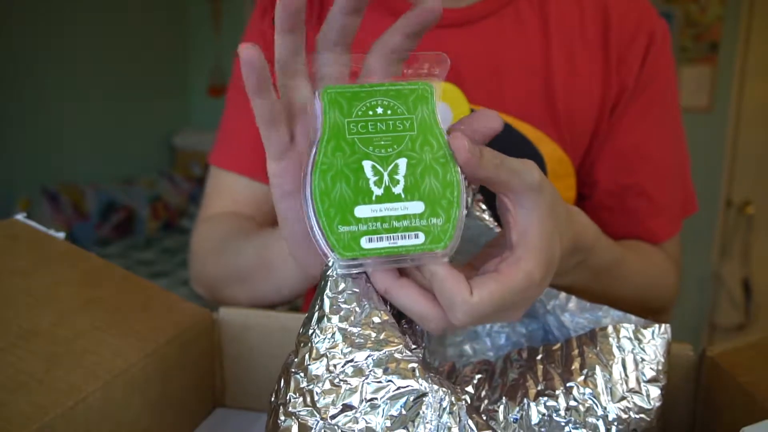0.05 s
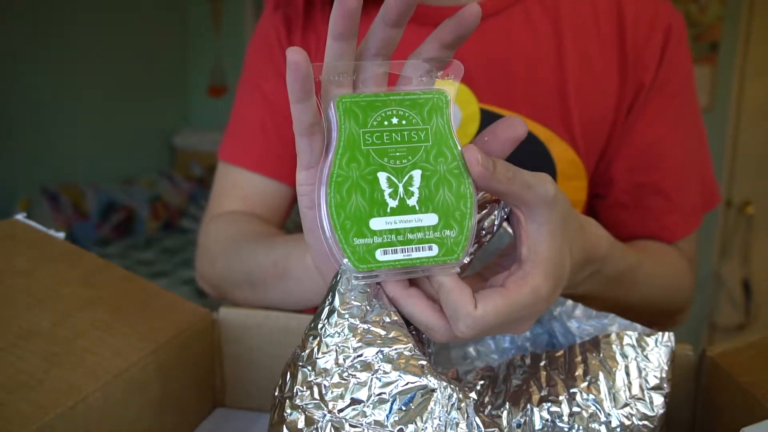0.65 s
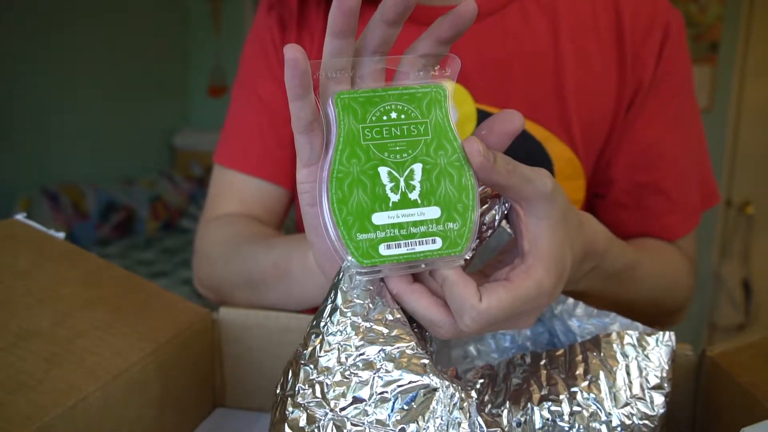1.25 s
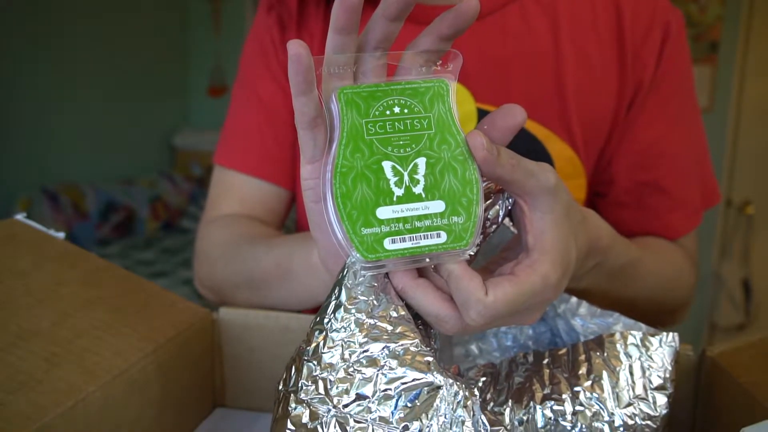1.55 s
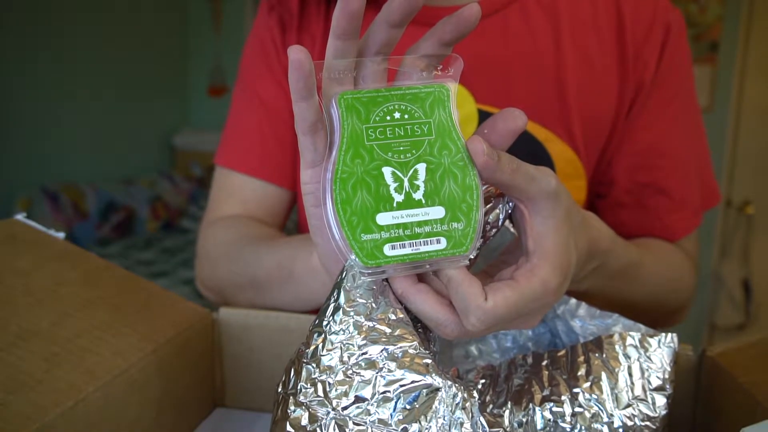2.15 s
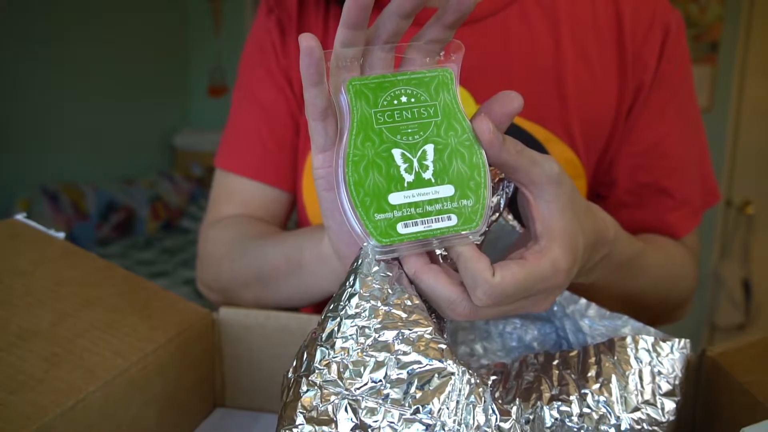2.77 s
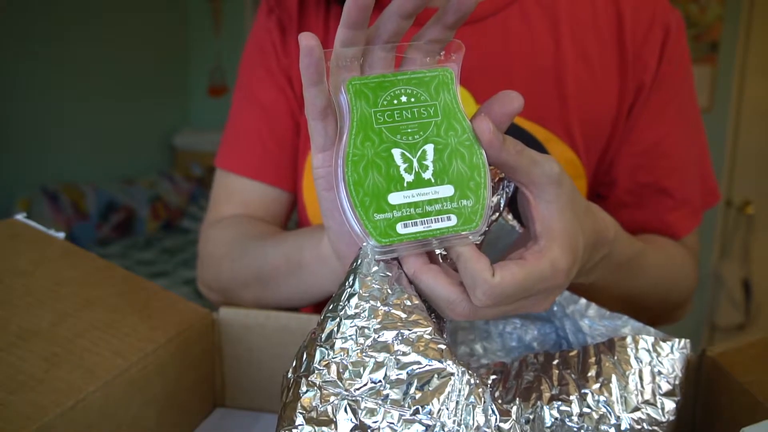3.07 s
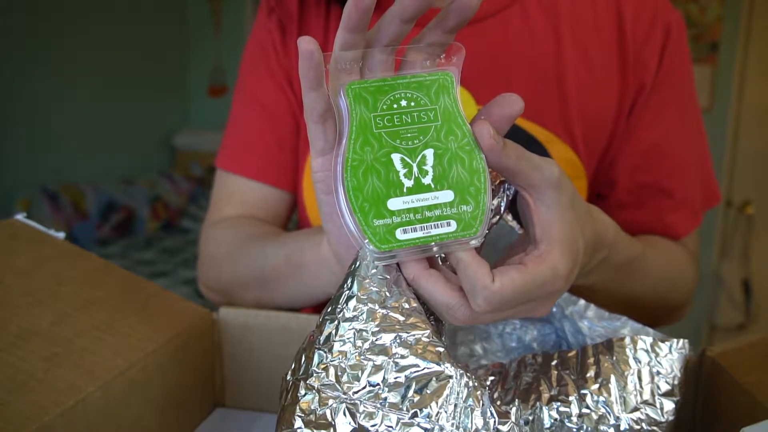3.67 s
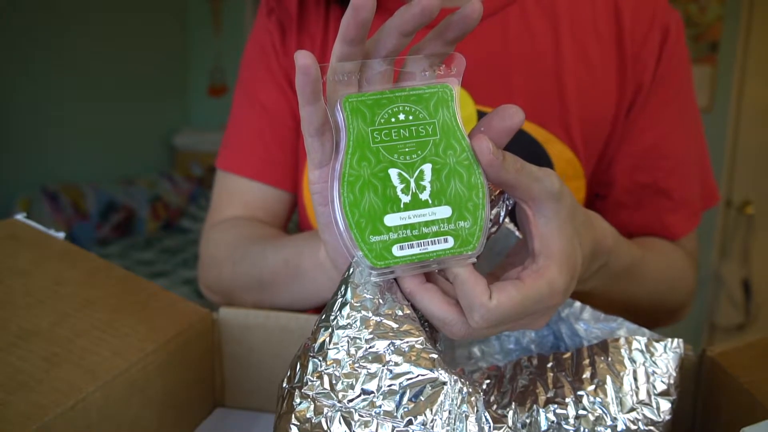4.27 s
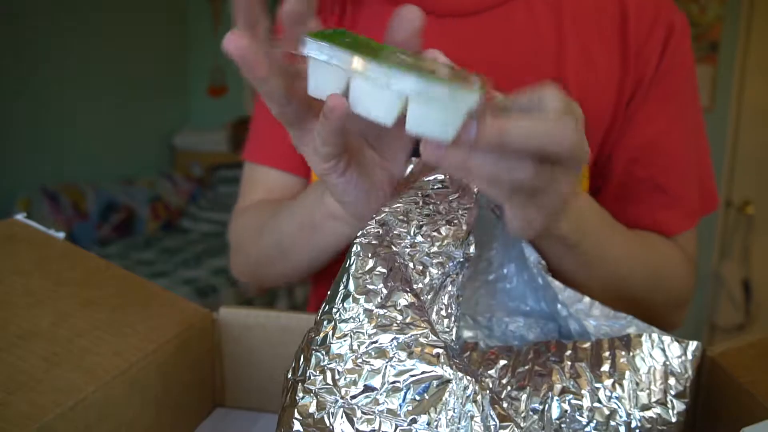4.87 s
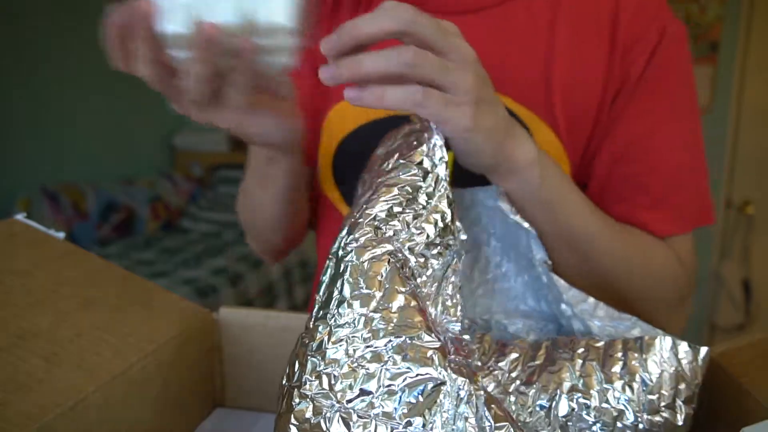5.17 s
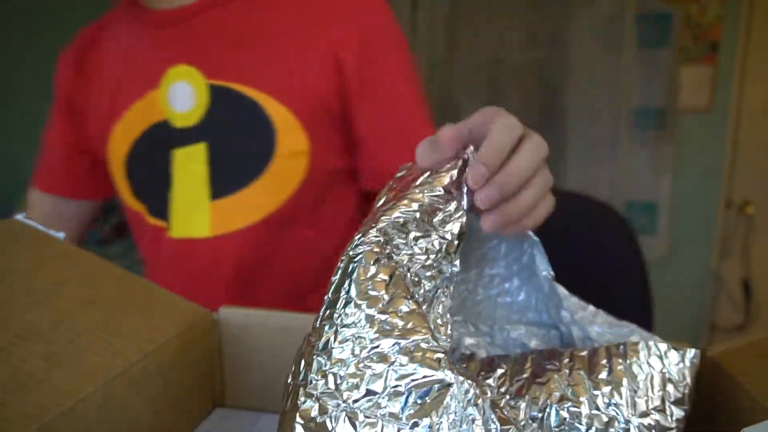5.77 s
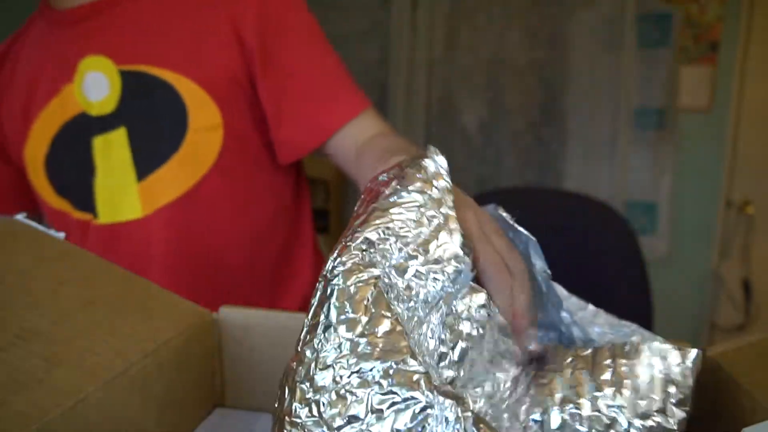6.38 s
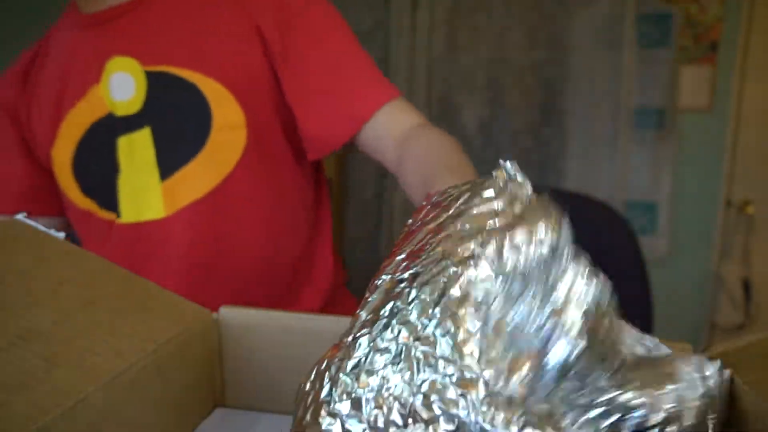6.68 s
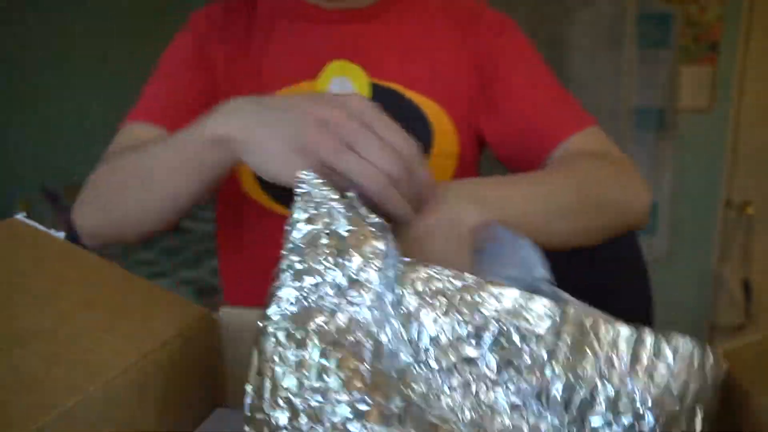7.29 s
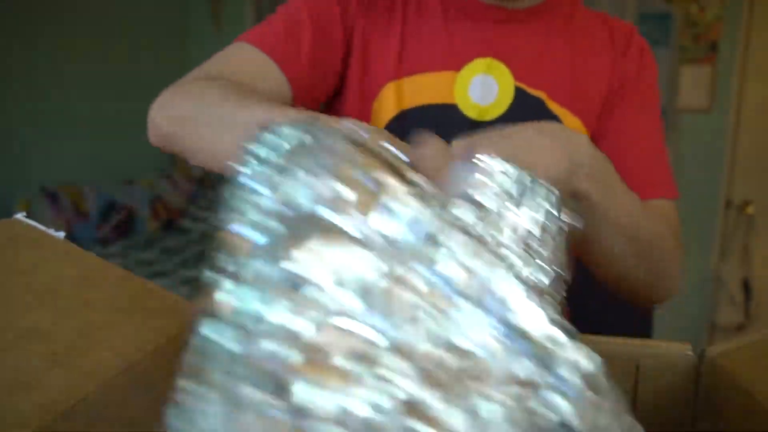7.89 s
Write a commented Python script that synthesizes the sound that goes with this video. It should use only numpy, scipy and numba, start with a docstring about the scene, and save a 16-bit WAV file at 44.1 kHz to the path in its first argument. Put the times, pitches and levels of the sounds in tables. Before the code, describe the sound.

A low fan hum runs throughout in a small furnished room, heard through a close stereo microphone. For the first second a foil-lined bubble bag crackles lightly with sharp single snaps. It then settles into faint, scattered ticks until about 4.6 seconds, with one brief soft crinkle, finger rub and low cardboard rumble around 2.4 seconds. The foil stirs again, and a thin plastic case clacks in the fingers just before 5 seconds. Uneven bursts of crinkling and crisp snaps follow, with hollow pops near 5.9 seconds. At about 6.2 seconds a cardboard box takes a strong hollow bump and several quick lighter knocks. From 6.4 seconds hands dig into the bag and the crinkling becomes dense, bright and loud, while the hum swells slightly. The rustling peaks around 7.7 seconds, with a cluster of hollow pops from the bag, and continues to the end at about 8 seconds.

```python
"""A foil-lined bubble bag crinkles as hands hold a thin plastic case against it, set that aside and dig in.
Its creases buckle and release stored elastic energy as snaps, singly at first, then in dense showers.
Fingers rub the sheet and broad panels pop hollowly; the case and a carton ring in their modes when hit.
A close stereo microphone hears it in a small furnished room where a fan hums."""
import sys
import numpy as np
from scipy import signal
from scipy.fft import rfft, irfft
from scipy.io import wavfile
from numba import njit

SR = 44100
rng = np.random.default_rng(int(sys.argv[2]) if len(sys.argv) > 2 else 0)


def int16_out(signal):
    """Quantize to a 16-bit WAV file."""
    q = np.round(np.clip(np.atleast_2d(signal).T, -1, 1) * 32767)
    wavfile.write(sys.argv[1], SR, q.astype(np.int16))


N = 354563
T = np.arange(N) / SR


def amp(db):
    """Amplitude ratio of a level in decibels."""
    return 10 ** (np.asarray(db) / 20)


def unit(x):
    """Normalisation to an rms of 1."""
    return x / np.sqrt(np.mean(x ** 2) + 1e-20)


def add(out, s, sound):
    """Superposition: a sound joins the mix at s seconds."""
    i = max(0, int(s * SR))
    out[:, i:i + sound.shape[-1]] += sound[..., :max(0, N - i)]


def colour(x, points, size=8192):
    """Minimum-phase filtering through (Hz, dB) points, by the folded cepstrum."""
    hz, db = np.transpose(points)
    bin_hz = np.arange(size // 2 + 1) * SR / size
    gain = amp(np.interp(np.log(bin_hz + 1), np.log(hz), db))
    cepstrum = irfft(np.log(gain))
    cepstrum[1:size // 2] *= 2
    cepstrum[size // 2 + 1:] = 0
    response = irfft(np.exp(rfft(cepstrum))).reshape((1,) * (x.ndim - 1) + (-1,))
    return signal.fftconvolve(x, response, axes=-1)[..., :x.shape[-1]]


def ring(x, hz, q):
    """Second-order resonance with gain 1 at its centre."""
    hz = min(hz, .4 * SR)
    return signal.lfilter(*signal.iirpeak(hz, max(q, 4 * hz / SR), fs=SR), x)


def stereo_noise(count):
    """White noise with uncorrelated mid and side."""
    mid, side = rng.standard_normal((2, count))
    return np.array([mid + side, mid - side])


def crack(t60, count=1024):
    """Exponential damping: a noise burst of unit energy falls 60 dB in t60 seconds."""
    burst = stereo_noise(count) * amp(-60 * T[:count] / t60)
    return unit(burst) / np.sqrt(count)


@njit
def scatter(starts, sizes, kinds, facets, count):
    """Sparse convolution: each flip adds its facet's stereo impulse response."""
    out = np.zeros((2, count + facets.shape[2]))
    for k in range(len(starts)):
        for side in range(2):
            for i in range(facets.shape[2]):
                out[side, starts[k] + i] += sizes[k] * facets[kinds[k], side, i]
    return out[:, :count]


def shower(db, rate, spectrum, low_hz, high_hz, t60, spread_db, ring_db, count=120, size=512):
    """Shot noise: resonant facets of foil flip at random moments, most weakly, a few strongly."""
    bursts = stereo_noise(count * size).reshape(2, count, size).swapaxes(0, 1)
    bursts = bursts * amp(-60 * T[:size] / t60)
    pitches = np.geomspace(low_hz, high_hz, count)
    facets = np.array([b + amp(ring_db) * ring(b, hz, q=8.6) for b, hz in zip(bursts, pitches)])
    facets = colour(facets, spectrum, size=1024)
    facets /= np.sqrt(np.sum(facets.mean(axis=1) ** 2) / count)
    strength_db = spread_db * np.minimum(rng.standard_exponential(N), np.pi)
    sizes = unit(amp(strength_db)) * rng.choice([-1, 1], N)
    sizes = sizes * amp(db) * np.sqrt(SR / rate)  # the flips of each second share its energy
    kinds = rng.integers(0, count, N)
    starts = np.flatnonzero(rng.random(N) < rate / SR)
    return scatter(starts, sizes[starts], kinds[starts], facets, N)


# Faint crinkle of the bag while it is only held. Each row: time in seconds, level in dB.
GRIP_LEVELS = [(0, -53), (.6, -55.5), (.9, -61), (1.4, -64), (1.55, -72.5), (1.8, -66), (2.7, -69.5),
               (3.2, -72), (3.6, -72), (4.2, -73), (4.55, -68.5), (4.7, -61)]
# The hands squeeze or shift the bag.
# Each row: start in seconds, length in seconds, level of small creases in dB, level of broad folds in dB.
BAG_SQUEEZES = [(-.05, 0.065, -36, -40), (0.052, 0.21, -36.5, -41.5), (0.32, 0.048, -45, -50),
                (2.353, 0.19, -46, -43), (2.608, 0.14, -62.5, -52.5), (3.711, 0.3, -65, -54.5),
                (4.654, 0.19, -45, -46.5), (4.786, 0.34, -52, -49.5), (5.074, 0.15, -34.5, -40),
                (5.177, 0.055, -34.5, -35.5), (5.292, 0.12, -47.5, -43.5), (5.454, 0.2, -40, -44.5),
                (5.635, 0.3, -40, -42), (5.873, 0.099, -33.5, -34), (5.978, 0.33, -39, -41.5),
                (6.115, 0.28, -35.5, -34), (6.397, 0.19, -30, -28.5), (6.598, 0.12, -31.5, -30.5),
                (6.673, .15, -26.5, -28.5), (6.866, .2, -27, -29.5), (7.07, 0.1, -26.5, -25.5),
                (7.239, 0.15, -31.5, -29.5), (7.336, .28, -25, -25.5), (7.601, 0.067, -22, -23),
                (7.684, 0.13, -21, -23), (7.806, 0.2, -26.5, -25.5)]


def effort(attack_s=0.049, release_s=0.038, grip_fold_db=1.5):
    """Incoherent sources add in power: grip and squeezes sum to crease and fold levels in dB."""
    grip_db = np.interp(T, *np.transpose(GRIP_LEVELS))
    power = amp([grip_db, grip_db + grip_fold_db]) ** 2
    for s, length, crease_db, fold_db in BAG_SQUEEZES:
        build_up = np.clip((T - s) / attack_s, 0, 1)
        settling = np.exp(-np.clip(T - s - length, 0, 1) / release_s)
        power += (amp([[crease_db], [fold_db]]) * build_up * settling) ** 2
    return 10 * np.log10(power)


# Spectra of small creases and of broad folds. Each row: frequency in Hz, relative level in dB.
CREASE_SPECTRUM = [(200, -24), (600, -15), (1500, 3), (3500, 3.5), (5000, 5.5), (7000, 3), (10500, 4),
                   (16000, 0)]
FOLD_SPECTRUM = [(120, -15), (280, -7.5), (480, -5.5), (800, -4), (1150, -7.5), (1750, -3.5), (2400, -6),
                 (3100, -5.5), (4400, -8.5), (6200, -14), (15000, -17)]


def crinkle():
    """Buckling under load: the harder the bag is worked, the more creases and folds give way."""
    crease_db, fold_db = effort()
    crease_rate = 150 + 2600 * amp(.85 * (crease_db + 26.5))  # flips per second
    fold_rate = 90 + .6 * crease_rate
    creases = shower(crease_db, crease_rate, CREASE_SPECTRUM,
                     low_hz=2500, high_hz=15000, t60=.007, spread_db=4.2, ring_db=0)
    folds = shower(fold_db, fold_rate, FOLD_SPECTRUM,
                   low_hz=480, high_hz=4800, t60=.015, spread_db=4, ring_db=2)
    return amp(-2.2) * creases + amp(0.23) * folds


# The rush of air. Each row: frequency in Hz, relative level in dB.
AIR_SPECTRUM = [(15, 5), (28, -11), (65, -0.5), (85, -2), (100, -3), (142, 5.5), (175, -10), (290, -13),
                (480, -22), (820, -19), (1100, -30), (3000, -37), (7000, -44.5), (16000, -48.5)]
# Fan and mains tones. Each row: frequency in Hz, level before the swell in dB, wander in Hz.
HUM_TONES = [(96.3, -49, 1.474), (105.1, -53, 1.14), (122.1, -51, 0.28), (137.9, -50, 0.26),
             (367, -65.5, 4.4), (405, -75.5, 3.04), (807, -68.5, 22.6)]
# The slow swell of air and hum together. Each row: time in seconds, gain in dB.
FAN_SWELL = [(0, 2), (1.2, 2), (2.2, 0.5), (3.2, 0), (4.2, 1), (4.7, 1), (5.7, 1), (6.6, 5), (8.04, 3)]


def fan():
    """Tonal and broadband noise: frequency-modulated motor tones waver over a low rush of air."""
    out = amp(-42.5) * unit(colour(stereo_noise(N), AIR_SPECTRUM))
    for hz, db, wander_hz in HUM_TONES:
        drift = np.interp(T, np.linspace(0, T[-1], 80), rng.standard_normal(80))
        cycles = np.cumsum(hz + wander_hz * drift) / SR + rng.random()
        out += amp(db) * np.sqrt(2) * np.sin(2 * np.pi * cycles)
    return out * amp(np.interp(T, *np.transpose(FAN_SWELL)))


def faint_ticks(count=20, until_s=4.7, doubling_db=9, low_hz=1500, high_hz=4000, flutter_db=3):
    """A random point process: rows of faint, dull snaps, denser where the grip is tighter."""
    moment, size, pitch = rng.random((count, 3)).T
    held = T[T < until_s]
    rate = 2 ** (np.interp(held, *np.transpose(GRIP_LEVELS)) / doubling_db)
    starts = np.interp((np.arange(count) + moment) / count, np.cumsum(rate) / rate.sum(), held)
    db = -42 + 4 * (2 * size - 1)
    hz = low_hz * (high_hz / low_hz) ** pitch
    return list(zip(starts, db, hz, np.full(count, flutter_db)))


# The loudest single snaps of foil and plastic.
# Each row: start in seconds, level in dB, resonance in Hz, flutter level relative to the tick in dB.
CREASE_SNAPS = [(0.037, -19, 3490, 2.5), (0.045, -14, 5220, -6), (0.0739, -12.5, 4390, -9),
                (.1098, -17.5, 1730, 1), (0.1434, -16.5, 5950, 3), (.1514, -23, 1790, 0),
                (.2678, -26, 1610, 8.5), (0.357, -21.5, 4420, -2), (.408, -24.5, 3380, -12),
                (0.4768, -35, 1770, 12.5), (0.5507, -13, 5650, -5.5), (.611, -19, 4690, -1),
                (.65, -22.5, 2180, -3), (.662, -23, 4600, -19), (.699, -25.5, 8900, -10),
                (.7555, -28.5, 4420, 2), (.818, -22, 9000, -17), (.831, -25, 3860, -4),
                (0.9362, -25, 3780, -5.5), (1.058, -27, 3370, -.5), (1.2, -28, 4510, -3),
                (1.355, -37, 1510, 9), (1.627, -24.5, 8250, -6), (1.7508, -32.5, 4870, -10),
                (1.773, -24.5, 4630, -17), (1.7974, -29.5, 3440, -7), (1.969, -37.5, 1820, 2),
                (2.2782, -38, 3760, 4.5), (2.2963, -27.5, 3820, -1), (2.422, -25, 3080, 3),
                (2.444, -24, 1780, 5), (2.6862, -18, 2730, -19), (2.7477, -31.5, 1580, 4),
                (2.833, -31.5, 2020, -2.5), (3.0039, -21.5, 12300, -4.5), (3.473, -31, 2930, -7),
                (3.79, -41, 2900, 10.5), (3.8382, -25.5, 1690, -22), (3.9077, -20, 6800, -28),
                (4.0304, -31.5, 5980, -4), (4.2241, -32, 4500, 1), (4.37, -29.5, 9450, -1),
                (4.608, -40.5, 1640, 7), (5.0717, -21, 3510, -8), (5.162, -21, 3220, 4),
                (5.1963, -12.5, 8900, -9), (5.458, -20, 1500, -3), (5.4944, -27, 2520, 9),
                (5.6798, -14.5, 5750, -19), (5.7824, -43, 3410, 0)]
# Spectrum of a snap's tick. Each row: frequency in Hz, relative level in dB.
SNAP_SPECTRUM = [(300, -17), (1200, -8), (3000, -2.5), (4500, -.5), (8000, -1), (12000, 0), (16000, 0)]


def snaps():
    """Snap-through buckling: one crease flips with a spike, a short ring and a duller flutter."""
    out = np.zeros((2, N))
    for s, db, hz, flutter_db in CREASE_SNAPS + faint_ticks():
        tick = crack(t60=.005) + amp(-5) * crack(t60=.02)
        tick[0, 2] += .6
        tick[1, 2 + rng.integers(-1, 2)] += .6  # the spike reaches the capsules up to a sample apart
        tick = colour(tick + ring(tick, hz, q=3), SNAP_SPECTRUM, size=1024)
        flutter = ring(crack(t60=0.045), hz=2160, q=0.82)
        snap = unit(tick) + amp(flutter_db) * unit(flutter)
        add(out, s + .0008, amp(db + 9) * snap / np.sqrt(snap.shape[1]))
    return out


def swell(length, rise):
    """Amplitude envelope: a half sine skewed to a quick rise and a rounded fall."""
    progress = np.linspace(0, 1, int(length * SR))
    return np.sin(np.pi * progress ** rise).clip(0)


# Fingers slide over the bag. Each row: start in seconds, length in seconds, level in dB,
# resonance in Hz, rise exponent (small is abrupt).
FINGER_RUBS = [(0.135, 0.024, -37.5, 1670, 0.87), (2.409, 0.29, -44, 2080, 0.78),
               (4.73, 0.17, -42, 1260, 0.42), (5.901, 0.058, -28, 2050, 0.59),
               (7.099, 0.072, -28.5, 1210, 0.32)]


def finger_rubs(slips_per_s=2500, bypass_db=-6):
    """Stick-slip friction: skin moves in dense jerks that excite the sheet's resonance."""
    out = np.zeros((2, N))
    for s, length, db, hz, rise in FINGER_RUBS:
        stroke = swell(length, rise)
        slips = (rng.random(SR) < slips_per_s / SR) * rng.standard_normal(SR)
        rasp = signal.fftconvolve((slips[:len(stroke)] * stroke)[None], crack(t60=0.0029), axes=-1)
        resonance = ring(ring(rasp, hz, q=1.1), hz, q=1.1)
        rub = colour(resonance + amp(bypass_db) * rasp, FOLD_SPECTRUM, size=1024)
        add(out, s, amp(db) * unit(rub))
    return out


# Soft shoves against the carton. Each row: start in seconds, length in seconds, level in dB.
CARTON_SHOVES = [(2.422, 0.25, -34), (6.78, 0.2, -37), (7.33, 0.15, -35), (7.87, 0.17, -38)]


def carton_shoves(hz=85, q=1.3):
    """Forced vibration: the carton rumbles in a low band for as long as the arms push it."""
    out = np.zeros((2, N))
    for s, length, db in CARTON_SHOVES:
        push = swell(length, rise=0.87)
        rumble = ring(ring(rng.standard_normal(SR), hz, q), hz, q)
        add(out, s, amp(db) * push * unit(rumble[-len(push):]))
    return out


def struck(modes, hz, count=12000):
    """Modal superposition: damped sines, rung by a blow that favours those near hz; peak 1."""
    t, body = T[:count], np.zeros(count)
    for k, (mode_hz, db, t60) in enumerate(modes):
        coupling = (-1) ** k / np.hypot(mode_hz / hz, hz / mode_hz)
        body += coupling * amp(db - 60 * t / t60) * np.sin(2 * np.pi * mode_hz * t)
    return body / np.abs(body).max()


# Broad panels of the bag give way. Each row: start in seconds, level in dB, lower mode in Hz.
PANEL_POPS = [(2.532, -34.5, 520), (4.861, -35, 394), (5.549, -36, 476), (5.905, -25, 700),
              (5.921, -25.5, 527), (7.096, -18, 480), (7.707, -21.5, 484), (7.771, -17.5, 620),
              (7.783, -19, 490), (7.806, -18.5, 780), (7.889, -18.5, 490), (7.897, -15.5, 686)]


def panel_pops():
    """Panel buckling: a broad face of the bag flips and rings hollowly in two inharmonic modes."""
    out = np.zeros((2, N))
    for s, db, hz in PANEL_POPS:
        modes = [(hz, 0, .04), (1.62 * hz, -5, .02)]
        add(out, s, amp(db + 2) * struck(modes, hz))
    return out


# Modes of the plastic case. Each row: frequency in Hz, level in dB, time to fall 60 dB in seconds.
PLASTIC_MODES = [(280, 5, 0.034), (675, 1, 0.0059), (1190, -1, 0.037), (1380, 1, 0.011), (2110, 3, 0.0067),
                 (2800, -5, .02), (3330, -2.5, 0.017), (3900, -8, .015), (4440, -4.5, 0.013)]
# The case knocks in the fingers. Each row: start in seconds, level in dB, brightness in Hz.
CASE_KNOCKS = [(4.9462, -31, 1300), (4.958, -15.5, 6000), (4.961, -19.5, 890)]


def case_knocks():
    """Impact on a thin shell: heavily damped modes and a burst of noise make a clack."""
    out = np.zeros((2, N))
    for s, db, hz in CASE_KNOCKS:
        add(out, s, amp(db + 3) * struck(PLASTIC_MODES, hz))
        add(out, s, amp(db + 15) * ring(crack(t60=0.011), hz, q=.5))
    return out


# Modes of the carton. Each row: frequency in Hz, level in dB, time to fall 60 dB in seconds.
CARDBOARD_MODES = [(141, 3, 0.11), (295.8, -2, 0.23), (344.6, -1.5, 0.25), (429, -6, 0.044),
                   (546, -11, 0.074), (666, -2, 0.054), (834, 4, 0.026), (930, -0.5, 0.044),
                   (1200, -29.5, .04), (1353, -19, 0.13)]
# Bumps on the carton. Each row: start in seconds, level in dB, brightness in Hz.
CARTON_BUMPS = [(6.157, -5.5, 530), (6.176, -25, 330), (6.185, -26, 400), (6.195, -15.5, 353),
                (6.254, -10.5, 740), (6.276, -15, 345), (6.347, -16, 586), (6.383, -15.5, 546)]


def carton_bumps():
    """Free vibration after impact: the carton's low modes ring on past a dull burst of noise."""
    out = np.zeros((2, N))
    for s, db, hz in CARTON_BUMPS:
        burst = crack(t60=0.067, count=2048)
        thud = ring(ring(burst, hz, q=0.68), hz, q=.8)
        add(out, s, amp(db - 2.5) * struck(CARDBOARD_MODES, hz))
        add(out, s, amp(db - 16) * unit(thud))
    return out


def room(x, low_t60_s=0.29, treble_t60_s=0.31, crossover_hz=4500, echo_db=-3.5, count=16000):
    """Reverberation: diffuse reflections decay exponentially among the furniture."""
    t, out = T[:count], x.copy()
    lowpass = signal.butter(2, crossover_hz, fs=SR, output="sos")
    onset = np.clip(t / 0.0013 - .5, 0, 1)
    block = SR // 2  # a new pattern of reflections each half second stands for the hands' movement
    for start in range(0, N, block):
        reflections = stereo_noise(count) * onset
        low = signal.sosfilt(lowpass, reflections)
        treble = amp(-0.5) * (reflections - low)
        tail = low * amp(-60 * t / low_t60_s) + treble * amp(-60 * t / treble_t60_s)
        echo = signal.fftconvolve(x[:, start:start + block], unit(tail) / np.sqrt(count), axes=-1)
        add(out, start / SR, amp(echo_db) * echo)
    return out


def scene():
    """Direct and reverberant sound add over the fan; single snaps face the microphone and sound drier."""
    ticks = snaps()
    handling = crinkle() + .7 * ticks + carton_bumps() + panel_pops() + case_knocks()
    handling += finger_rubs() + carton_shoves()
    return room(handling) + .45 * ticks + fan()


# Stereo width. Each row: frequency in Hz, gain of the side signal in dB.
SIDE_GAIN = [(60, -64), (130, -41.5), (260, -15.5), (600, -10.5), (1700, -9), (2600, -5.5), (5500, -1.5),
             (12500, -2.5), (15000, -6)]


def record(dry, top_hz=15900):
    """Coherence at long wavelengths: two close capsules hear the bass alike; the top is cut."""
    mid = (dry[0] + dry[1]) / 2
    side = colour((dry[0] - dry[1]) / 2, SIDE_GAIN)
    # the left capsule is a little weaker in the presence range
    left = colour(mid + side, [(1200, 0.16), (2200, -0.87), (3500, -0.6), (5500, 0.76)], size=512)
    right = colour(mid - side, [(1200, 0), (2200, 0.37), (3500, 1.5), (5500, 1.0)], size=512)
    lowpass = signal.ellip(10, .2, 70, top_hz, fs=SR, output="sos")
    return signal.sosfilt(lowpass, [left, right])


dry = scene()
out = record(dry)
int16_out(out)
```